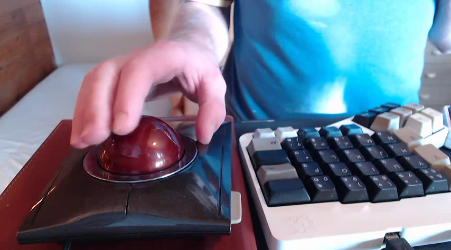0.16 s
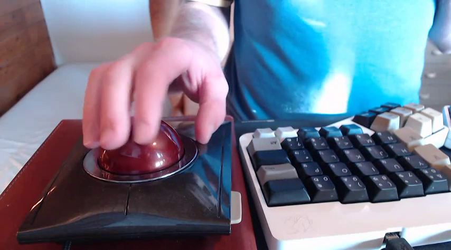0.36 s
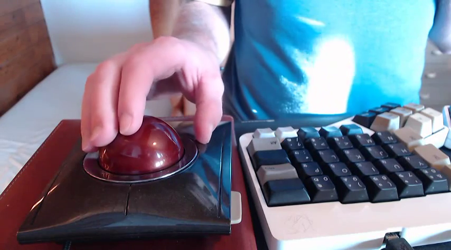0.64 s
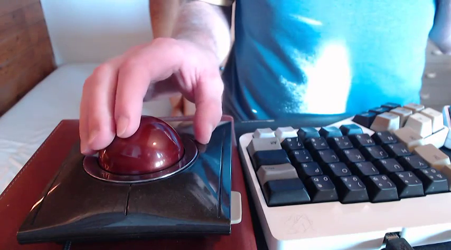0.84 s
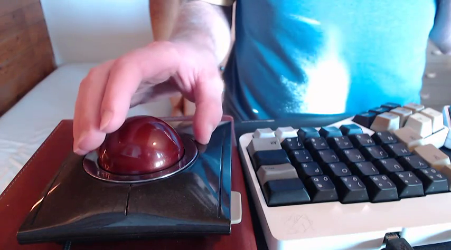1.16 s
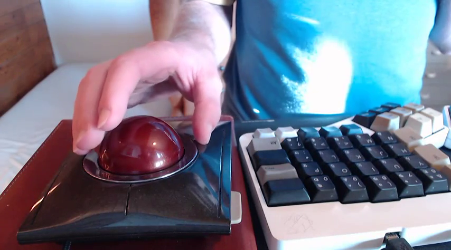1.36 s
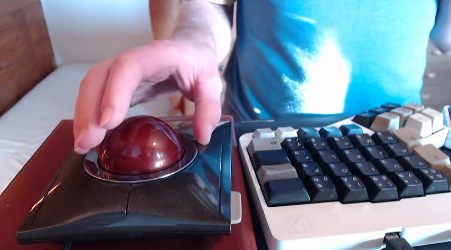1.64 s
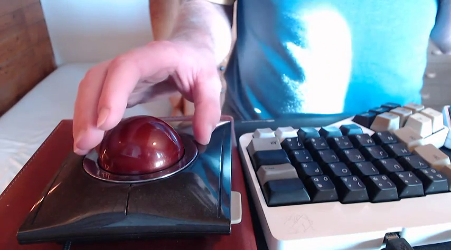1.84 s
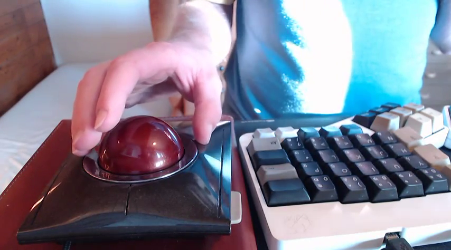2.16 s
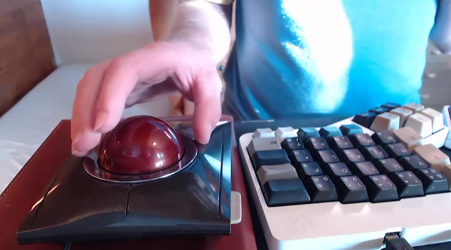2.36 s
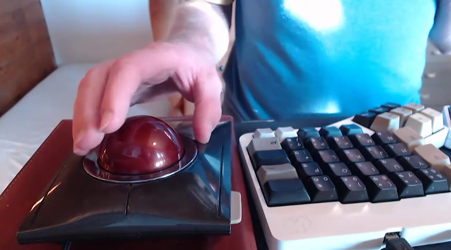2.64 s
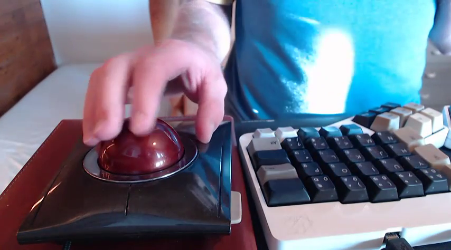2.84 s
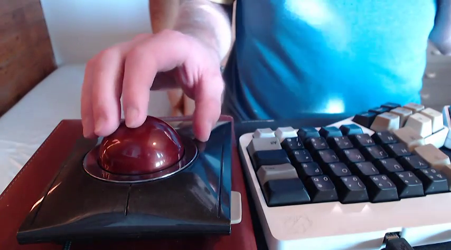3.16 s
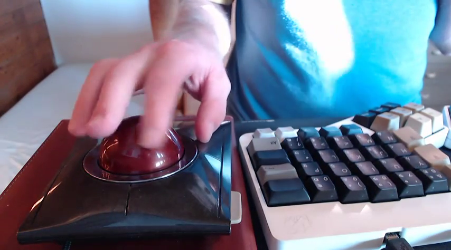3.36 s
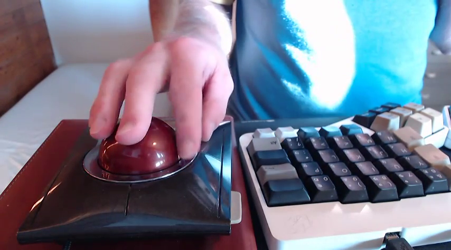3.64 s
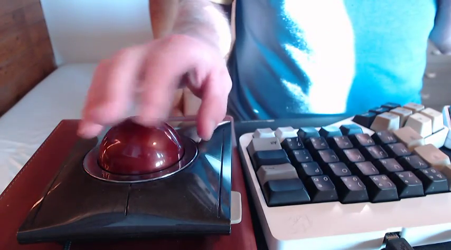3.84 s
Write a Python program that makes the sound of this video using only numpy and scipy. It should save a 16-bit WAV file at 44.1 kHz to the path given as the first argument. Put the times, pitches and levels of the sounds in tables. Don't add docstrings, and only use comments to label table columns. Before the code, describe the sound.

A trackball button clicks seven times, each press and release a bright snap; then fingertips tap, rub and flick the ball. Close microphone in a small room, low fan hum, hiss and thin electronic whine.

```python
import sys
import numpy as np
from scipy import signal
from scipy.fft import rfft, irfft, next_fast_len
from scipy.io import wavfile
from scipy.ndimage import uniform_filter1d

SR = 44100
rng = np.random.default_rng(int(sys.argv[2]) if len(sys.argv) > 2 else 0)


def decibels_to_gain(level_db):
    exponent = np.asarray(level_db, float) / 20
    return 10 ** exponent


def store_pcm(level_fs):
    pcm = np.round(np.clip(level_fs, -1, 1) * 32767).astype(np.int16)
    wavfile.write(sys.argv[1], SR, np.atleast_2d(pcm).T)


N = 176400

# frequency in Hz, level in dB per Hz.
RUMBLE = [(12, -46), (20, -5.5), (86, -10), (108, -13.5), (198, -4.5), (225, -10), (471, -23), (863, -24),
          (1000, -43), (1300, -70), (2200, -120)]
# frequency in Hz, level in dB per Hz.
HISS = [(590, -27), (1000, -2.5), (1830, -2), (3400, -12), (4550, -13.5), (4860, -18), (8530, -11),
        (9300, -19), (12800, -20)]
# frequency in Hz, width in Hz, depth from 0 to 1.
HISS_NOTCHES = [(8540, 320, 0.8), (11200, 190, 0.8), (5700, 170, .5)]
# frequency in Hz, likeness from 0 to 1.
LIKENESS = [(60, 0.88), (130, 0.91), (280, 0.82), (610, 0.14), (1330, 0.6), (2880, 0.84), (6250, 0.88),
            (13600, 1)]
# frequency in Hz, left over right in dB.
LEAN = [(60, 1.5), (130, 3), (280, -0.5), (610, 3), (1330, -2.5), (2880, -2), (6250, 7.5), (13600, 4.5)]
# frequency in Hz, width in Hz, level in dB.
FAN_LINES = [(119.2, 12.6, -67.5), (195, 7.6, -68), (1217, 26, -77.5), (1584, 3.5, -78.5), (1798, 9.5, -78)]

# frequency in Hz, level in dB.
WHINES = [(7370, -82), (9841, -77)]
# frequency in Hz, first time in seconds, length in seconds, level in dB.
BLIPS = [(4493, 0.0597, 0.0089, -61), (9140, 0.0595, 0.0091, -60), (7990, 0.065, 0.0062, -59)]

# middle in seconds, length in seconds, level in dB, frequency in Hz.
THUMPS = [
    (0.241, 0.1, -54, 63.5),
    (2.793, 0.21, -56, 62.6),
    (3.456, 0.079, -46, 57.4),
    (3.928, 0.074, -37.5, 59),
]

# start in seconds, peak in dB, ring in Hz, t60 in seconds.
TAPS = [(0.161, -46.5, 579, 0.067), (0.43, -46, 495, 0.032), (1.235, -40.5, 505, 0.024),
        (2.252, -39.5, 513, 0.033), (2.51, -40.5, 559, 0.07), (2.543, -44, 585, 0.047),
        (2.606, -53.5, 525, 0.046), (2.911, -52, 406, 0.034), (2.938, -46, 564, 0.057),
        (3.124, -44, 396, 0.024), (3.148, -36, 514, 0.022), (3.181, -48, 380, 0.028),
        (3.248, -46, 401, 0.025), (3.265, -43.5, 561, 0.062), (3.297, -47, 411, 0.078),
        (3.307, -49, 496, 0.028), (3.338, -53, 440, 0.027), (3.411, -49, 415, 0.12),
        (3.973, -45, 400, 0.035)]
# start in seconds, peak in dB.
FLICKS = [
    (3.692, -31),
]
# frequency in Hz, level in dB, t60 in seconds, polarity.
BALL = [(553, -8.5, 0.048, 1), (600, -1.5, 0.1, 1), (784, -17.5, 0.056, -1), (985, 0.5, 0.02, 1),
        (1068, -11, 0.039, 1), (1540, -16.5, 0.051, 1), (1850, -12, 0.017, -1), (2520, -12.5, 0.017, 1)]
# middle in seconds, length in seconds, level in dB.
RUBS = [
    (0.327, 0.21, -56.5),
    (2.958, 0.23, -61.5),
    (3.163, 0.22, -54),
    (3.344, 0.29, -51.5),
    (3.99, 0.24, -53.5),
]
# frequency in Hz, level in dB per Hz.
SKIN = [(130, -28), (220, -2.5), (409, -11.5), (478, -6.5), (663, -3), (727, -8), (1740, -13.5),
        (1960, -21.5), (9000, -38), (11700, -66), (19800, -120)]
# frequency in Hz, width in Hz, level over the skin noise in dB.
RUB_RINGS = [(264.6, 17, -3.5), (410.6, 15, 9), (668, 17, -22), (5670, 1600, -1)]

# start in seconds, peak in dB.
PRESSES = [(.9, -24.5), (1.0991, -24.5), (1.4538, -24.5), (1.6885, -24.5), (1.8913, -25), (2.0857, -24.5),
           (2.295, -24.5)]
# start in seconds, peak in dB.
RELEASES = [(1.003, -24), (1.1736, -23.5), (1.5646, -23.5), (1.7756, -24), (2.0027, -23.5), (2.2001, -23.5),
            (2.4212, -23.5)]
# frequency in Hz, level in dB, t60 in seconds, left over right in dB, polarity.
HOUSING = [(524, 6.5, .018, 3.1, 1), (735, -10, .02, 5.5, -1), (945, -8, .014, 4.5, 1),
           (1085, -19, .029, 5, -1), (1392, -16.5, .036, -1, -1), (1696, -8.5, .018, .2, -1),
           (1964, -6, .011, 3.4, -1), (2200, -18, .012, 5, 1), (3080, -12, .01, 8, -1),
           (2519, -16.4, .024, 1.5, -1), (2856, -6.2, .01, 9, 1)]
# frequency in Hz, level in dB, t60 in seconds, left over right in dB, polarity.
DESK = [(398, -31, .3, 1, -1), (476, -32.5, .3, 3, -1), (629, -26, .117, 3.7, 1),
        (660, -32.5, .26, 2.6, -1), (866, -24, .108, 1.5, 1), (1145, -31.5, .071, 4, 1),
        (1301, -27.5, .094, 4.4, 1), (1557, -30, .056, 0, -1)]
# frequency in Hz, change in dB.
RELEASE_RINGS = [(530, -.5), (640, 3), (740, 1), (950, 1), (1090, -.7)]
# frequency in Hz, press in dB, release in dB, t60 in seconds, left over right in dB.
SPRING = [(3554, -15, -23, 0.016, 1.5), (4170, -5.5, -6.5, 0.0053, -4.5), (4630, -17.5, -17, 0.012, 24),
          (5100, -30.5, -26.5, 0.035, -10), (5970, -12.5, -9.5, 0.007, 1), (6485, -21, -14, 0.018, 1),
          (6780, -13.5, -6.5, 0.014, 5), (7140, -13.5, -13.5, 0.012, 1), (7750, -13, -21.5, .01, 0),
          (8580, -24, -32, 0.019, 0), (10130, -13, -12, 0.0056, 1.5), (12200, -23, -36, 0.0029, 0)]
# level in dB, rise in seconds, t60 in seconds.
CRACK = (-8, 0.0011, 0.012)
# press in dB, release in dB, t60 in seconds.
SCATTERED = (-31, -26, 0.24)
# frequency in Hz, level in dB.
CRACK_COLOUR = [(1500, -14), (3500, -14), (4700, -3), (5600, -7), (6900, 0), (8300, -11), (13000, -19)]
# frequency in Hz, width in Hz, depth from 0 to 1.
DESK_NOTCHES = [(3460, 290, 0.43), (5420, 150, 0.7)]
SNAP_LEAD_S = .0008, .0006
KNOCK_LEAD_S = .00042, .00066

# delay in seconds, level in dB.
ECHOES = [(.035, -25.5), (0.059, -24.5)]
# frequency in Hz, t60 in seconds.
ROOM_DECAY = [(300, 0.3), (1500, 0.18), (6500, 0.052)]
# frequency in Hz, level in dB.
ROOM_COLOUR = [(500, -10.5), (1000, -2), (2000, 2), (2800, -9.5), (5000, -18)]

FRAME_S = 1.0002 / 24
START_S, GAP_S, GAP_END_S = .047, 3.7665, 3.79
TAP_RISE_S = 0.0012


def unit(x):
    return x / np.sqrt(np.mean(x ** 2) + 1e-20)


def along(points, hz):
    f, v = np.transpose(points)
    return np.interp(np.log(hz + 1), np.log(f + 1), v)


def filtered(x, response):
    m = next_fast_len(N + SR // 2)
    return irfft(rfft(x, m) * response(np.fft.rfftfreq(m, 1 / SR)), m)[..., :N]


def resonance(f, centre_hz, width_hz):
    return 1j * f * width_hz / (centre_hz ** 2 - f * f + 1j * f * width_hz)


def notches(f, table):
    return np.prod([1 - np.clip(depth, 0, 1) * resonance(f, hz, width) for hz, width, depth in table], axis=0)


def sides(lean_db):
    return decibels_to_gain(np.array([lean_db / 2, -lean_db / 2]))


def ring(hz, db, t60, rise_s, lag_s=0):
    t = np.abs(np.arange(SR // 6) / SR - lag_s)
    rise = (1 - np.exp(-t / rise_s)) ** 2
    return decibels_to_gain(db - 60 * t / t60) * np.sin(2 * np.pi * hz * t) * rise


def add(out, s, sound):
    part = out[..., round(s * SR):][..., :sound.shape[-1]]
    part += sound[..., :part.shape[-1]]


def swell(middle_s, length_s):
    return np.cos(np.pi * np.clip((np.arange(N) / SR - middle_s) / length_s, -.5, .5)) ** 2


def stereo_noise(spectrum):
    def mid_side(hz):
        angle = np.arccos(np.clip(along(LIKENESS, hz), -1, 1)) / 2
        level = decibels_to_gain(along(spectrum, hz)) * (hz > spectrum[0][0])
        return level * [np.cos(angle), np.sin(angle)]

    mid, side = filtered(rng.standard_normal((2, N)), mid_side)
    left_right = np.array([mid + side, mid - side])
    return unit(filtered(left_right, lambda hz: sides(along(LEAN, hz))))


def background():
    lines = np.zeros(N)
    for hz, width_hz, db in FAN_LINES:
        line = filtered(rng.standard_normal(N), lambda f: 1 / (1 + ((f - hz) / width_hz * 2) ** 2))
        lines += decibels_to_gain(db) * unit(line)
    rumble = decibels_to_gain(-59) * stereo_noise(RUMBLE + [(1400, -73)])
    hiss = decibels_to_gain(-67) * filtered(stereo_noise(HISS), lambda f: notches(f, HISS_NOTCHES))
    return rumble + hiss + lines


def electronics():
    t = np.arange(N) / SR
    out = np.zeros(N)
    comb = [(k * 199.97, -86 + 2.5 * rng.standard_normal()) for k in range(26, 55)]
    for hz, db in WHINES + comb:
        out += decibels_to_gain(db) * np.sin(2 * np.pi * (hz * t + rng.random()))
    clock = t - .0112 * (t > GAP_END_S)
    for hz, first_s, length_s, db in BLIPS:
        since = (clock - first_s + FRAME_S / 2) % FRAME_S - FRAME_S / 2
        frame = np.round((clock - first_s) / FRAME_S).astype(int)
        vary_db, turn = rng.standard_normal((2, 128))[:, frame]
        level = decibels_to_gain(db + 0.64 * vary_db) * (frame != 82)
        bump = np.cos(np.pi * np.clip(since / length_s, -.5, .5))
        out += level * bump * np.sin(2 * np.pi * (hz * t + turn))
    return out * decibels_to_gain([[0], [-15]])


def wrist():
    t = np.arange(N) / SR
    out = np.zeros(N)
    for middle_s, length_s, db, hz in THUMPS:
        wave = np.sin(2 * np.pi * hz * (middle_s - t) + 1)
        out += decibels_to_gain(db) * swell(middle_s, length_s) ** .5 * wave
    return out * sides(1.4)[:, None]


def rubbing():
    chance, size = rng.random(N), rng.exponential(size=N)
    sign, smooth = rng.standard_normal((2, N))
    grains = unit((chance < 700 / SR) * decibels_to_gain(1.3 * size) * sign)

    def colour(f):
        rings = 1 + sum(3 * decibels_to_gain(db) * resonance(f, hz, width) for hz, width, db in RUB_RINGS)
        return decibels_to_gain(along(SKIN, f)) * rings * (f > SKIN[0][0]) * (f < SKIN[-1][0])

    strokes = sum(decibels_to_gain(db) * swell(middle_s, length_s) for middle_s, length_s, db in RUBS)
    return unit(filtered(grains + .8 * smooth, colour)) * strokes


def touch_noise():
    ticks = np.zeros(N)
    for s, db, *_ in [*TAPS, *FLICKS]:
        add(ticks, s, decibels_to_gain(db - 11.5 - 60 * np.arange(SR // 20) / SR / 0.048))
    centre_hz = 1370
    return filtered(ticks * rng.standard_normal(N),
                    lambda f: 4j * f / centre_hz / (1 + 1j * f / centre_hz) ** 3.17)


def fingers():
    out = touch_noise() + rubbing()
    for s, db, hz, t60 in TAPS:
        overtone = ring(hz * 1.663, -6.5, t60 / 2, TAP_RISE_S)
        add(out, s, decibels_to_gain(db + 4.5) * (ring(hz, 0, t60, TAP_RISE_S) + overtone))
    for s, db in FLICKS:
        rattle = sum(polarity * ring(hz, mode_db, t60, TAP_RISE_S) for hz, mode_db, t60, polarity in BALL)
        add(out, s - .001, -decibels_to_gain(db + 3) * rattle)
    return out * sides(3.5)[:, None]


def housing_knock(released, scatter_db):
    out = 0
    for k, (hz, db, t60, lean_db, polarity) in enumerate(HOUSING + DESK):
        level = db + released * along(RELEASE_RINGS, hz) + scatter_db[-k]
        out = out + polarity * sides(lean_db)[:, None] * ring(hz, level, t60, .0017)
    return out


def spring_snap(released, scatter_db):
    lag_s = np.array([[0], [.000016]])
    out = 0
    for k, (hz, down_db, up_db, t60, lean_db) in enumerate(SPRING):
        level = (up_db if released else down_db - 1.5) + scatter_db[k]
        out = out + (-1) ** k * sides(lean_db)[:, None] * ring(hz, level, t60, 0.00068, lag_s)
    return out


def button():
    body, spring = np.zeros((2, N)), np.zeros((2, N))
    bright, dull = np.zeros((2, N)), np.zeros((2, N))
    t = np.arange(SR // 4) / SR - .005
    crack = decibels_to_gain(CRACK[0]) * np.where(t < 0, np.exp(t / CRACK[1]), decibels_to_gain(-60 * t / CRACK[2]))
    for released, hits in enumerate((PRESSES, RELEASES)):
        tail = decibels_to_gain(SCATTERED[released] - 60 * t / SCATTERED[2]) * (t > 0)
        habit = rng.standard_normal((3, len(t)))
        scatters_db = rng.standard_normal((len(hits), 32))
        for (s, db), scatter_db in zip(hits, scatters_db):
            push = (-1) ** released * decibels_to_gain(db + 5.5)
            add(body, s - KNOCK_LEAD_S[released], push * housing_knock(released, scatter_db))
            add(spring, s - SNAP_LEAD_S[released], push * spring_snap(released, scatter_db))
            shared, left, right = habit + .6 * rng.standard_normal((3, len(t)))
            contact = shared + 0.27 * np.array([left, right])
            add(dull if released else bright, s - .005, abs(push) * crack * contact)
            add(dull, s - .005, abs(push) * tail * (left + 0.45 * np.array([shared, right])))
    noise = bright + filtered(dull, lambda f: 1 / (1 + (f / 10400) ** 10))
    noise = filtered(noise, lambda f: decibels_to_gain(along(CRACK_COLOUR, f)) * f / (f + 1500)) * sides(2.4)[:, None]
    click = filtered(spring + noise, lambda f: notches(f, DESK_NOTCHES))
    return click + filtered(body, lambda f: f ** 8 / (f ** 8 + 300 ** 8))


def room(x):
    hz, t, z = signal.stft(rng.standard_normal((3, SR // 2)), SR, nperseg=128)
    decay_db = along(ROOM_COLOUR, hz)[:, None] - 60 * t / along(ROOM_DECAY, hz)[:, None]
    shared, left, right = signal.istft(z * decibels_to_gain(decay_db), SR, nperseg=128)[1]
    tail = 0.3 ** .5 * shared + 0.7 ** .5 * np.array([left, right])
    tail = decibels_to_gain(-22) * tail / np.linalg.norm(shared)
    tail = np.pad(tail, ((0, 0), (260, 0)))

    def reflections(f):
        delays = sum(decibels_to_gain(db) * np.exp(-2j * np.pi * f * delay_s) for delay_s, db in ECHOES)
        return delays / (1 + 1j * f / 2500) ** 2

    return filtered(x, reflections) + signal.fftconvolve(x, tail, axes=1)[:, :N]


def scene():
    hand = button() + fingers()
    return hand + room(hand) + wrist() + background() + electronics()


def top_cut(x):
    return signal.sosfilt(signal.butter(12, 14160, fs=SR, output="sos"), x)


def record(dry):
    t = np.arange(N) / SR
    gate = (t > START_S) * np.where((t > GAP_S) & (t < GAP_END_S), decibels_to_gain(-17), 1)
    gated = dry * uniform_filter1d(gate, size=40)
    mix = filtered(gated, lambda hz: 1 / (1 + np.exp(np.clip((hz - 12960) / 148, -40, 40))))
    return top_cut(mix)


dry = scene()
out = record(dry)
store_pcm(out)
```